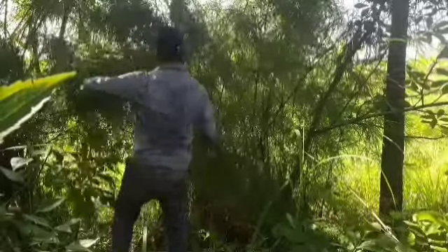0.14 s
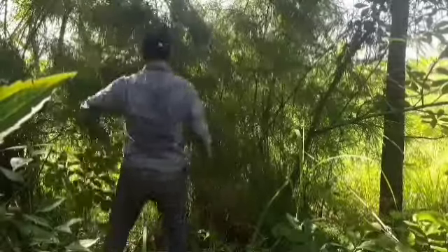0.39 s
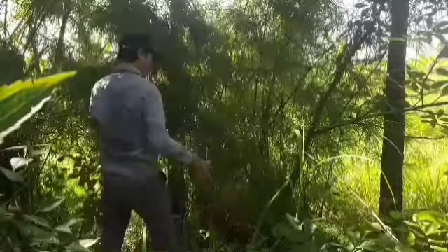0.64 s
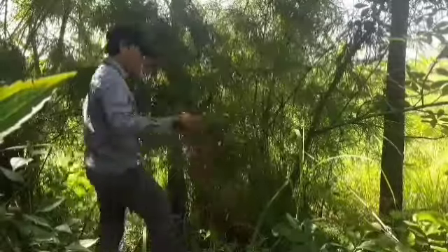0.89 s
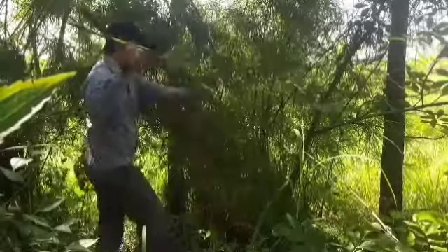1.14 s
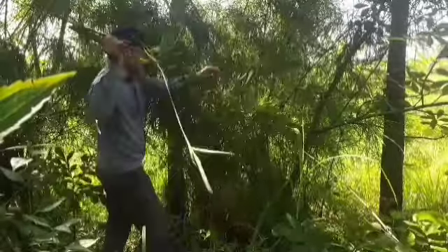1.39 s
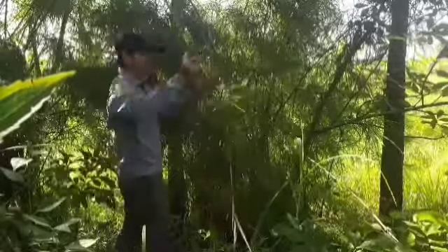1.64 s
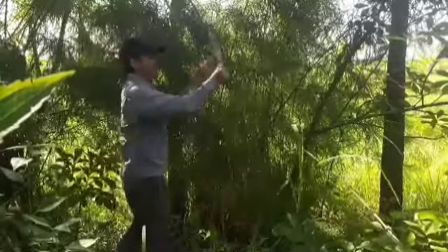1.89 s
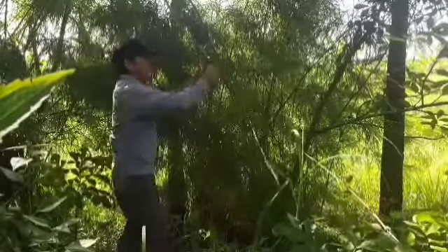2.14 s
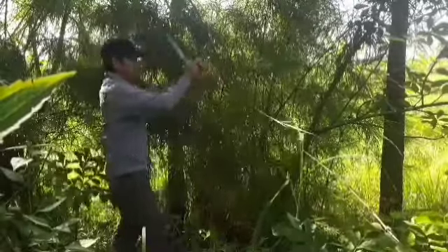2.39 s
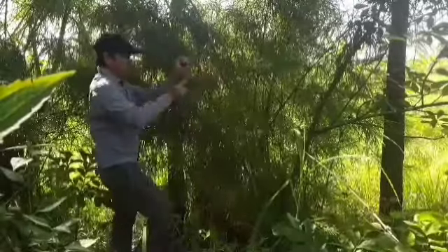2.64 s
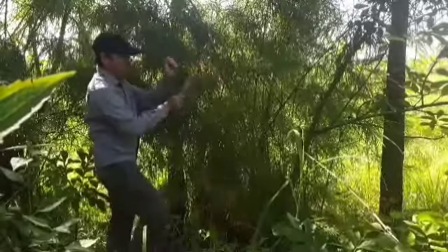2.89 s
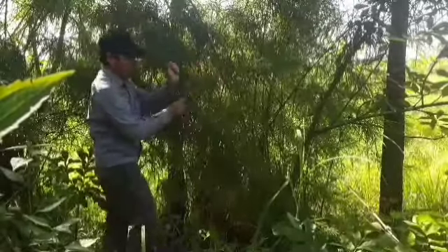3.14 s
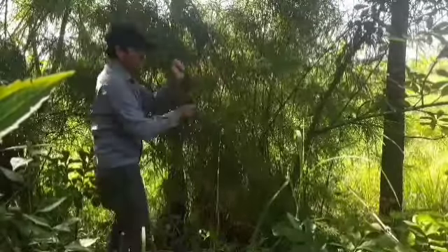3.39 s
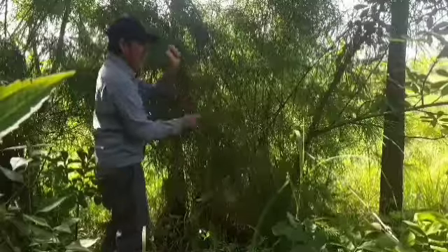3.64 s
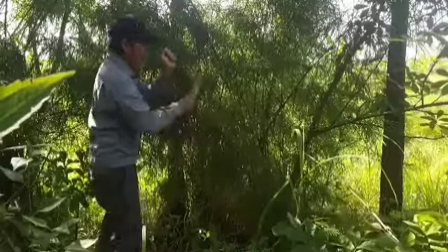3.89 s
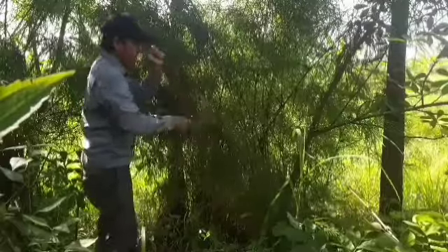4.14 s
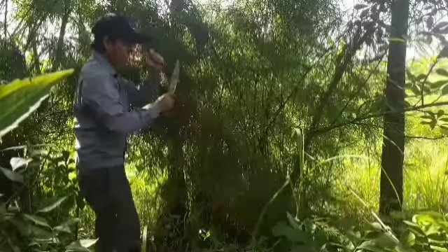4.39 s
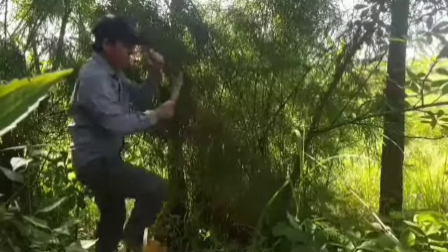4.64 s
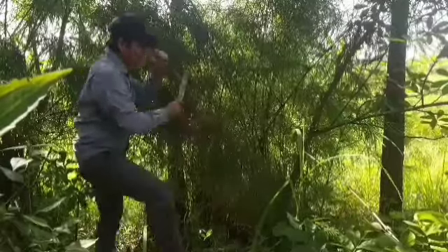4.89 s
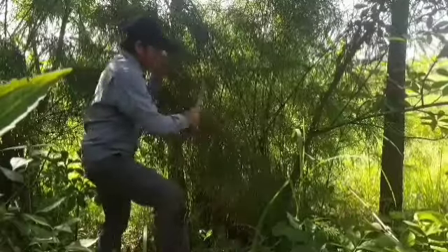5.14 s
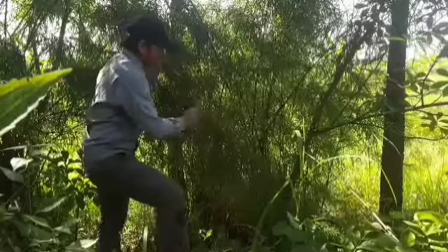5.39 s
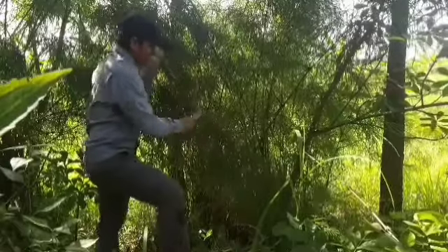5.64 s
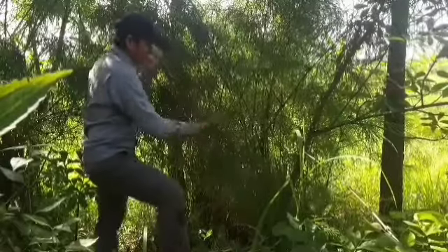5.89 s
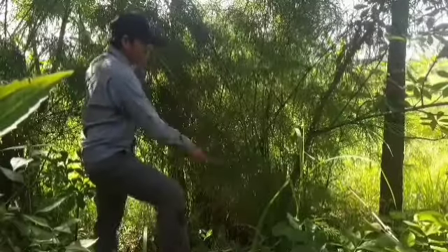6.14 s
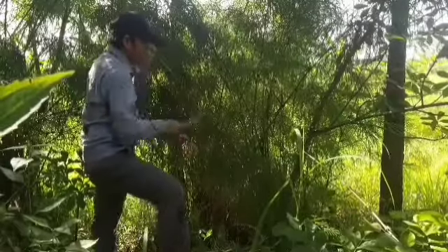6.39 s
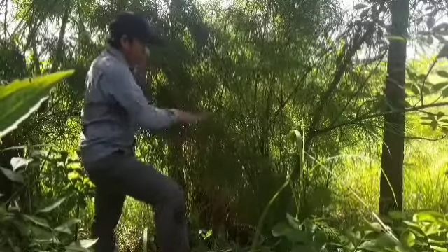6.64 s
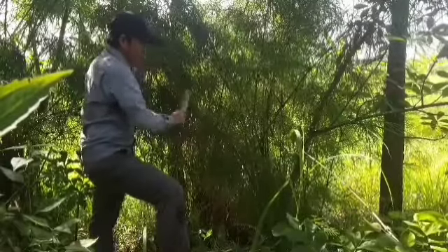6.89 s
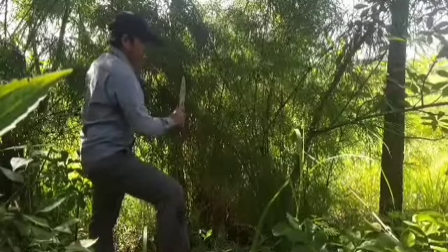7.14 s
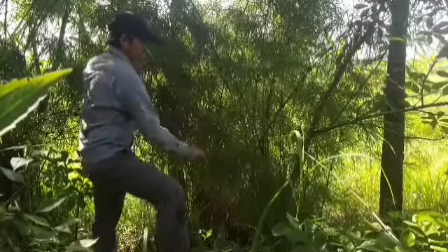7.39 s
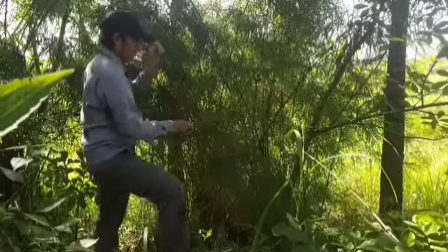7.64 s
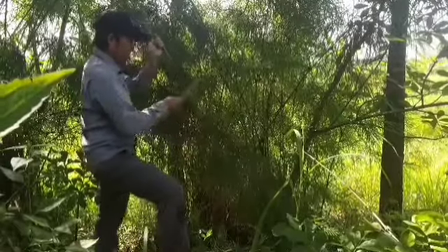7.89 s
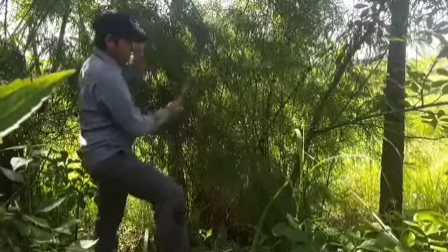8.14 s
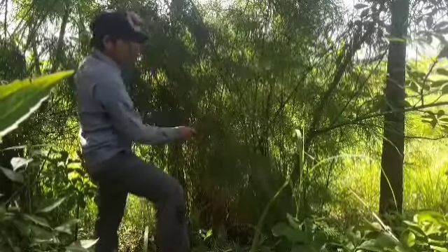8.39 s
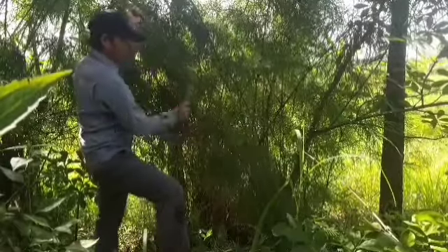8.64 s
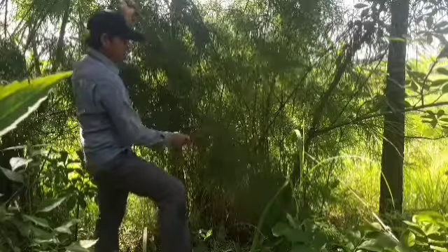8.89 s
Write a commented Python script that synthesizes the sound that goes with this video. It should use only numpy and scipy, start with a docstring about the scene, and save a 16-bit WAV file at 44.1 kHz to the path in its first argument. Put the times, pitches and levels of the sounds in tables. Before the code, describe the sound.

In a thicket outdoors, a few metres from the microphone, leaves swell into a loud brushing rustle at 0.3-0.7 s with small twig snaps, and again around 1.2-1.3 s with a soft scuff. A lull follows, with very faint falling bird peeps at about 1.6 and 2.1 s. From 2.3 s a machete hacks thin woody stems: short, dry, bright cracks at uneven intervals, often preceded by a light blade tap, the one near 2.85 s especially sharp. Chops continue through 3-5 s with twig snaps, dull scuffs and leaf shakes; a strong, longer splintering break comes at 5.1 s, another crack at 5.4 s. Strokes near 6.0, 6.2 and 6.6 s bring a sharp leafy swish, then a pause until a double crack at 7.5 s, and more at 8.0 and 8.5 s, ending in soft rustle. Low wavering rumble and thin hiss lie underneath, with short diffuse woodland reverberation.

```python
"""Leaves rustle and twigs snap over a low outdoor rumble and a thin hiss, with a far bird peeping.
Then a machete hacks thin woody stems in a thicket, a few metres from the microphone.
Its taps and cuts are decaying noise bursts that ring modes of blade and wood; torn stems crackle in clumps.
Foliage is filtered noise and ticks that swell with each movement; scuffs and thuds are dull noise swells.
Rumble and hiss are shaped noise with a faint drone; the bird is falling sine notes heard by reverberation."""
import sys
import numpy as np
from scipy import signal
from scipy.fft import rfft, irfft, next_fast_len
from scipy.io import wavfile
from scipy.ndimage import map_coordinates

SR = 44100
rng = np.random.default_rng(int(sys.argv[2]) if len(sys.argv) > 2 else 0)


def digitize_waveform(pressure):
    """Quantize a signal to 16-bit integers and store it at the path in sys.argv[1].

    Rows of a 2-D input are taken as channels; values are limited to [-1, 1].
    """
    field = np.atleast_2d(pressure).T
    bounded = np.clip(field, -1, 1)
    quanta = np.round(bounded * 32767).astype(np.int16)
    wavfile.write(sys.argv[1], SR, quanta)


N = 397341

# The blade breaks through a stem. Each row: time of the break in seconds, crack level in dB, low wood in dB,
# high wood in dB, top treble edge in dB, decay by 60 dB in seconds, knock pitch in Hz,
# relative splintering level in dB, relative thud level in dB.
CUT_ROWS = [(2.3102, -34.5, -4.5, -7.5, 0.5, 0.013, 2000, -48, -65),
            (2.5459, -33, 1.5, -4, 3.5, 0.016, 2450, -42, -52.5),
            (2.8469, -23.5, -9, -10.5, -0.5, 0.01, 1820, -46.5, -49),
            (3.2573, -30.5, -6.5, -7.5, -1.5, 0.02, 2460, -44, -69),
            (3.7539, -30.5, -6.5, -13, 4.5, 0.0085, 2250, -52, -60.5),
            (3.9973, -33, -14, -13, -5, 0.021, 1330, -61, -53.5),
            (4.1881, -35.5, 5.5, -19, 7.5, 0.01, 950, -47.5, -54.5),
            (4.5188, -27.5, -12, -5, -5, 0.015, 4400, -43, -80),
            (4.859, -34.5, -10.5, -10.5, -13, 0.02, 1500, -48.5, -75),
            (5.1046, -29, 9.5, 7.5, 4.5, 0.052, 3470, -44, -62),
            (5.391, -26, -5.5, -11, -6.5, 0.0092, 3500, -39.5, -60),
            (5.9685, -36, -7.5, -10, -3, 0.026, 4820, -50, -79),
            (6.2276, -47.5, 3, 3, -22, 0.017, 2220, -48, -77),
            (6.571, -30.5, -7.5, -7.5, -18, 0.017, 2940, -43, -58),
            (7.5254, -31, -4, -4, 7, 0.011, 2200, -40.5, -80),
            (7.559, -31, -2.5, -8, 7, 0.021, 4960, -39, -57.5),
            (8.019, -36.5, -2, -8.5, -13, 0.018, 4400, -34.5, -45.5),
            (8.503, -30, -15, -10, -1.5, 0.0094, 4370, -41.5, -74.5),
            (8.5303, -34.5, -0.5, 4, -8, 0.0076, 4540, -50, -65)]


def amp(db):
    """Decibels to gain."""
    return 10 ** (np.asarray(db) / 20)


def unit(x):
    """x at rms 1."""
    return x / np.sqrt(np.mean(x ** 2) + 1e-20)


def along(points, hz):
    """(Hz, value) points read on a log frequency axis."""
    f, v = np.transpose(points)
    return np.interp(np.log(hz + 1), np.log(f + 1), v)


def wobble(rate):
    """A smooth random curve through rate random knots a second."""
    knots = rng.standard_normal(int(N * rate / SR) + 4)
    return map_coordinates(knots, [np.arange(N) * rate / SR])


def coloured(x, level):
    """x through the causal minimum-phase filter whose gain in dB is level(Hz)."""
    m = 2 * next_fast_len((len(x) + 4096) // 2)
    gain = amp(level(np.fft.rfftfreq(m, 1 / SR)))
    cepstrum = irfft(np.log(gain + 1e-6), m)
    # folding the cepstrum onto positive time makes the filter causal
    cepstrum[1:m // 2] *= 2
    cepstrum[m // 2 + 1:] = 0
    return irfft(rfft(x, m) * np.exp(rfft(cepstrum)), m)[:len(x)]


def shaped(x, spectrum):
    """Long noise given a spectrum, at rms 1."""
    m = next_fast_len(N + SR // 4)
    gain = amp(along(spectrum, np.fft.rfftfreq(m, 1 / SR)))
    return unit(irfft(rfft(x, m) * gain, m)[:N])


def crackle(size, rate, spread_db, smooth):
    """Tiny clicks of random sign, rate a second, on a bed of smooth noise."""
    chance = rng.random(size)
    strength = np.minimum(rng.standard_exponential(size), 4)
    clicks = (chance < rate / SR) * amp(spread_db * strength) * rng.choice([-1, 1], size)
    return unit(unit(clicks) + smooth * rng.standard_normal(size))


def add(track, s, sound):
    """Mix a sound into the track at time s in seconds."""
    start = max(0, round(s * SR))
    track[start:start + len(sound)] += sound[:max(0, N - start)]


def scattered(x, wet_db):
    """The diffuse return of x from the surrounding stems: a fresh decaying noise tail at every call."""
    # Reverberation of the thicket. Each row: frequency in Hz, decay by 60 dB in seconds.
    thicket_decay = [(200, 0.28), (2000, 0.21), (8000, 0.24), (15000, 0.26)]
    hz, t, z = signal.stft(rng.standard_normal(SR // 3), SR, nperseg=256)
    decay = amp(-60 * t / along(thicket_decay, hz)[:, None])
    onset = 1 - np.exp(-t / 0.00067)
    tail = signal.istft(z * decay * onset, SR, nperseg=256)[1]
    return amp(wet_db) * signal.fftconvolve(x, tail / np.linalg.norm(tail))


def outdoors():
    """A low noise rumble of wavering level with a faint two-partial drone, and steady thin high hiss."""
    # Slow course of the rumble. Each row: time in seconds, relative level in dB.
    rumble_course = [(0.0, -59.5), (0.42, -61.5), (0.57, -55), (0.92, -57.5), (1.15, -62.5), (1.68, -58),
                     (2.2, -62.5), (2.5, -63.5), (2.68, -56.0), (2.95, -63), (3.15, -55.5), (3.7, -65),
                     (4.15, -50.5), (4.5, -58.5), (5.2, -54.5), (5.3, -66), (5.45, -51), (5.65, -57.5),
                     (6.35, -58.5), (6.9, -57.5), (7.85, -55), (8.1, -50.5), (8.7, -60.5), (9.01, -56.5)]
    # Colour of the rumble noise. Each row: frequency in Hz, relative level in dB.
    rumble_spectrum = [(20, -34.5), (32, -21.5), (45, -5), (57, 5.5), (72, 1.5), (98, -3.5), (118, 0),
                       (150, -4.5), (200, -13.5), (290, -14.5), (400, -32.5), (600, -59)]
    # Colour of the hiss. Each row: frequency in Hz, relative level in dB.
    hiss_spectrum = [(200, -26), (400, -8.5), (700, -12), (1200, -18), (2400, -15), (3500, -25),
                     (5200, -20), (7200, -14), (7900, -1.5), (8800, 7), (9800, -16.5), (15500, -38)]
    times, levels = np.transpose(rumble_course)
    rumble_db = np.interp(np.arange(N) / SR, times, levels)
    # the drone's pitch wanders around 57.5 Hz
    phase = 2 * np.pi * np.cumsum(57.5 + 2 * wobble(7)) / SR
    drone = np.sin(phase) + 0.64 * np.sin(2 * phase + wobble(15))
    waver_db = 1.0 * wobble(rate=12)
    rumble_noise = shaped(rng.standard_normal(N), rumble_spectrum)
    rumble = amp(rumble_db + waver_db - 0.3) * unit(rumble_noise + 0.34 * drone)
    return rumble + amp(-68.5) * shaped(rng.standard_normal(N), hiss_spectrum)


def bird():
    """A far bird: brief falling whistles, only their diffuse return reaching us from deep in the wood."""
    # Each row: time of the note's peak in seconds, pitch there in Hz, relative level in dB,
    # time from peak to 1/e in seconds.
    peep_rows = [(1.569, 3220, -75, 0.0089), (1.71, 3280, -86, .025), (2.106, 3350, -86.5, 0.013)]
    fall_hz_per_s = 2700
    track, t = np.zeros(N), np.arange(-SR // 10, SR // 10) / SR
    for s, hz, db, length in peep_rows:
        tone = np.sin(2 * np.pi * (hz - fall_hz_per_s * t / 2) * t)
        note = amp(db) * np.exp(-(t / length) ** 2) * tone
        add(track, s + t[0], scattered(note, wet_db=1.0))
    return track


def swell(s, rise, fall):
    """Gain that grows smoothly to 1 at time s and then dies away."""
    damping = 1.31  # exponent of the fall; above 1 a branch comes to rest more abruptly
    t = np.arange(N) / SR - s
    distance = np.where(t < 0, (t / rise) ** 2, np.abs(t / fall) ** damping)
    return np.exp(-np.minimum(distance, 20))


def twig_ticks(rate, centre_hz, cycles, spread_db):
    """Small twigs tapping each other: decaying sine grains, each with its own brief pitch; rms 1."""
    draws = rng.random((int(rate * N / SR), 3))  # time, pitch and strength of each tap
    t = np.arange(SR // 250)
    hz = centre_hz * 5 ** (draws[:, 1:2] - .5)
    strength = np.minimum(-np.log(1 - draws[:, 2:]), 3)
    size = np.sqrt(hz) * amp(spread_db * strength)
    phase = hz * t / SR  # in cycles
    grains = size * np.sin(2 * np.pi * phase) * np.exp(-phase / cycles)
    places = (draws[:, :1] * N).astype(int) + t
    return unit(np.bincount(places.ravel(), grains.ravel(), N)[:N])


def foliage():
    """Fine leaves brush and tick when a branch is moved or cut, while twigs scrape, tap and knock."""
    # Branches pulled, pushed or thrown aside. Each row: time at the height in seconds, relative leaf level in dB,
    # relative twig level in dB, rise in seconds.
    rustle_rows = [(0.3, -56.5, -73, 0.55), (0.54, -46, -52, 0.13), (0.65, -48.5, -52.5, 0.071),
                   (0.96, -59.5, -78.5, 0.14), (1.19, -51, -64.5, .075), (1.28, -51, -58, 0.063),
                   (1.42, -63.5, -80, 0.074), (1.62, -69, -88, 0.065), (1.902, -64.5, -71.5, 0.075),
                   (2.68, -62, -66.5, 0.11), (3.0, -66.5, -74.5, 0.24), (3.22, -58, -66, 0.043),
                   (3.458, -57.5, -66, 0.067), (3.7, -67, -71, 0.056), (3.87, -59, -65.5, 0.065),
                   (4.11, -62.5, -64, 0.11), (4.23, -64, -60, 0.12), (4.96, -59, -65.5, 0.045),
                   (5.741, -63, -80, 0.093), (6.258, -49, -54, 0.028), (6.93, -63.5, -77.5, 0.13),
                   (7.48, -63, -69, .06), (7.73, -79.5, -76.5, 0.028), (8.159, -53, -60, 0.075),
                   (8.7, -64.5, -81, 0.21), (8.98, -60.5, -75, 0.25)]
    # Colour of the leaves. Each row: frequency in Hz, relative level in dB.
    leaf_spectrum = [(300, -71), (2500, -29.5), (5000, -11), (7200, -10), (7900, -1.5), (8700, 1),
                     (10500, -2.5), (12300, -1.5), (14000, -6.5), (15500, -4)]
    # Colour of the scraping twigs. Each row: frequency in Hz, relative level in dB.
    twig_spectrum = [(100, -30), (400, -1.5), (900, 3.5), (2200, 4), (4500, 4.5), (7000, -4.5),
                     (12000, -48)]
    still_leaf_db, still_twig_db = -75, -93  # relative levels between movements
    shake_leaf_db, shake_twig_db = -20, -31.5  # a cut's shaking, added to its splintering column
    shake_delay_s, shake_rise_s, shake_fall_s = 0.079, 0.041, 0.15

    # a moved branch settles as slowly as it rose
    moves = [(s, leaf_db, twig_db, rise, rise) for s, leaf_db, twig_db, rise in rustle_rows]
    for s, *_, db, _ in CUT_ROWS:
        moves.append((s + shake_delay_s, db + shake_leaf_db, db + shake_twig_db, shake_rise_s, shake_fall_s))
    leaf_power, twig_power = amp(still_leaf_db) ** 2, amp(still_twig_db) ** 2
    for s, leaf_db, twig_db, rise, fall in moves:
        motion = swell(s, rise, fall) ** 2
        leaf_power = leaf_power + amp(leaf_db) ** 2 * motion
        twig_power = twig_power + amp(twig_db) ** 2 * motion

    flutter = wobble(28)
    touches = crackle(N, rate=3000, spread_db=3.5, smooth=1.1)
    dry_leaves = amp(-9) * crackle(N, rate=110, spread_db=-1, smooth=0)  # single ticks
    leaf_gain = amp(3 + 1.8 * flutter + 0.55 * wobble(160))
    leaves = leaf_gain * shaped(touches + dry_leaves, leaf_spectrum)

    scrape = shaped(rng.standard_normal(N), twig_spectrum)
    taps = twig_ticks(rate=220, centre_hz=2690, cycles=2.2, spread_db=1.5)
    knocks = twig_ticks(rate=70, centre_hz=1700, cycles=3.1, spread_db=3)  # thicker twigs
    twigs = amp(-4.5 + 1.1 * flutter) * unit(scrape + amp(-5) * taps + amp(-8.5) * knocks)
    return np.sqrt(leaf_power) * leaves + np.sqrt(twig_power) * twigs


def scuffs():
    """Soft swells of litter underfoot, each around its own pitch; each cut's dull knock and lower shudder."""
    # Dull scuffs of feet and thrown branches. Each row: time of the peak in seconds, level in dB,
    # time from peak to 1/e in seconds, centre in Hz.
    scuff_rows = [(1.294, -59.5, 0.047, 387), (2.596, -56.5, 0.019, 417), (2.672, -63.5, 0.054, 305),
                  (3.883, -55.5, 0.025, 290), (4.242, -63, 0.027, 330), (4.312, -57.5, 0.032, 322)]
    # A cut stem knocks, then its base shudders, at pitches shared by all cuts. Each row: delay after the cut
    # in seconds, level in dB added to the cut's thud column, time from peak to 1/e in seconds, centre in Hz.
    thud_rows = [(0.007, 1.5, 0.007, 704), (0.025, -9.5, 0.029, 359)]
    # Colour of a scuff centred on 500 Hz. Each row: frequency in Hz, relative level in dB.
    scuff_spectrum = [(90, -51), (280, -0.5), (430, 7), (560, 2), (850, -3), (1500, -14.5), (3200, -33),
                      (9000, -52)]
    track, t = np.zeros(N), np.arange(-SR // 6, SR // 6) / SR
    thuds = [(s + delay, thud_db + db, length, hz)
             for s, *_, thud_db in CUT_ROWS for delay, db, length, hz in thud_rows]
    for s, db, length, centre_hz in scuff_rows + thuds:
        grains = crackle(len(t), rate=400, spread_db=3.5, smooth=1.0)
        litter = coloured(grains, lambda f: along(scuff_spectrum, f * 500 / centre_hz))
        add(track, s + t[0], amp(db) * unit(litter) * np.exp(-(t / length) ** 2))
    return track


def splinters():
    """The blade sweeps in through leaves; the severed stem tears in a dense, clumped crackle that dies quickly."""
    # Colour of the tearing. Each row: frequency in Hz, relative level in dB.
    tear_spectrum = [(80, -23), (300, -16.5), (900, -4.5), (2200, -0.5), (4500, -2.5), (7100, -10),
                     (7900, -2.5), (10000, 2.5), (10700, -4.5), (12000, -1), (15500, -5)]
    track, t = np.zeros(N), np.arange(-SR // 20, SR // 4) / SR
    sweep = amp(-17.5) * np.exp(-((t + 0.0079) / 0.013) ** 2)
    rip = (1 - np.exp(-np.maximum(t, 0) / 0.0014)) * amp(-60 * t / 0.11)
    for s, _, _, wood_db, *_, db, _ in CUT_ROWS:
        body_db = -9 + 0.15 * wood_db  # woody body partly follows the stem's high wood
        clumps = amp(2 * map_coordinates(rng.standard_normal(96), [(t - t[0]) * 300]))
        grains = crackle(len(t), rate=1700, spread_db=0.0, smooth=1.0) * clumps
        body = [(3000, body_db), (7500, 0)]  # Hz, dB
        tear = unit(coloured(grains, lambda f: along(tear_spectrum, f) + along(body, f)))
        tear = amp(db + 7.5) * tear * (sweep + rip)
        add(track, s + t[0], tear)
        add(track, s + t[0], scattered(tear, wet_db=-4.5))
    return track


def resonance(f, hz, width):
    """Complex gain of one mode, 1 at its centre."""
    return 1 / (1 + 2j * (f - hz) / width)


def crack(db, low_db, high_db, edge_db, t60, knock_hz, rise):
    """Fibres give way faster and faster, the stem breaks 10 ms in, and blade and wood ring for a moment."""
    # Colour of the bare break. Each row: frequency in Hz, relative level in dB.
    crack_spectrum = [(60, -1), (250, -3), (600, -6), (1500, -0.5), (3000, 4), (5500, 2.5), (7200, -0.5),
                      (7900, 4), (9000, 2.5), (10500, -2.5), (12000, -0.5), (15500, -1.5)]
    # Ring of blade and stems. Each row: central pitch in Hz, width in Hz, central lift in dB.
    ring_modes = [(786, 72, 1.5), (1322, 52, 3.5), (2198, 170, 6), (3275, 28, -10), (4406, 120, 9.5),
                  (6260, 220, 11), (8070, 190, 12), (9770, 380, 8.5), (11530, 1100, 10)]
    lead = SR // 100
    t = np.arange(-lead, SR // 20) / SR

    def sized(x):
        """x scaled to the energy of 5 ms at rms 1."""
        return x * np.sqrt(.005 * SR) / np.linalg.norm(x)

    life = max(t60, .003)  # seconds
    # tough stems that fail slowly also start slowly
    envelope = amp(-60 * np.maximum(t / life, -t / (rise * life)))
    fibres = crackle(len(t), rate=5000, spread_db=1.0, smooth=0.91) * envelope
    force = fibres / np.linalg.norm(fibres)
    force[lead] += 0.2 * min(1, 0.0015 / life)  # the break's single step, weaker for a slow break
    stem = [(2400, low_db), (3600, high_db), (7100, high_db), (7700, 0), (9900, 0.0099), (12200, edge_db)]
    bare = coloured(force, lambda f: along(crack_spectrum, f) + along(stem, f))

    # every contact rings the modes at slightly new pitches and new strengths
    chance = rng.standard_normal((len(ring_modes), 2))
    modes = [(hz * (1 + .005 * a), width, lift + 2.5 * b)
             for (hz, width, lift), (a, b) in zip(ring_modes, chance)]
    # the struck stem adds its own knock, and its side twigs ring at chance pitches
    modes.append((knock_hz, 0.082 * knock_hz, 12.5))
    modes += [(hz, 40, 3) for hz in 1000 * 15 ** rng.random(size=12)]

    def ring_db(f):
        """Lift in dB from the summed power of all modes."""
        power = sum(np.abs(amp(lift) * resonance(f, hz, width)) ** 2 for hz, width, lift in modes)
        return 10 * np.log10(1 + power)

    snap = coloured(bare, ring_db)
    # a quick clip of the blade stirs the thicket less than a slow break
    stir = min(1, life / 0.0073) ** .5
    sound = stir * scattered(sized(bare + 0.64 * snap), wet_db=-7.0)
    sound[:len(t)] += amp(0.07) * sized(snap)
    return amp(db) * sound


def cracks():
    """Blade taps, cuts and snapping twigs all crack the same way, with their own brightness and build-up."""
    # The blade meets a stem on its way in. Each row: time of the contact in seconds, crack level in dB,
    # mean wood level in dB, decay by 60 dB in seconds, knock pitch in Hz.
    tap_rows = [(2.5299, -40, -3, 0.019, 2360), (2.8329, -32.5, -9, 0.018, 1880),
                (3.238, -38.5, -2.5, 0.017, 4450), (3.7334, -31, -9.5, 0.0088, 2410),
                (3.9804, -32.5, -5.5, 0.022, 2260), (4.4427, -41, -11.5, 0.0067, 2110),
                (4.4948, -46, -5, 0.021, 4360), (4.8226, -43, -1, 0.011, 2460),
                (5.062, -34, -12, .017, 4970), (5.3558, -39.5, -9.5, 0.042, 4360),
                (5.876, -37.5, -9.5, 0.017, 3120), (6.1306, -31.5, -13, 0.011, 6200),
                (6.5078, -34.5, -13.5, 0.016, 4450), (7.9711, -34.5, -14.5, 0.022, 3070),
                (8.487, -40.5, -13.5, .02, 4350)]
    # Side twigs and last fibres snap. Each row: time of the break in seconds, crack level in dB,
    # mean wood level in dB, top treble edge in dB, decay by 60 dB in seconds.
    snap_rows = [(0.3855, -42.5, -27, -1, 0.012), (0.3974, -34, -33, -5.5, 0.03),
                 (0.4343, -39, -16, 4, .014), (0.678, -37, -11, 4, 0.063), (1.3016, -46, -14, 3, 0.018),
                 (1.4234, -56, 2, -6, .028), (2.2846, -51.5, -2, -2, 0.046), (2.645, -52, -15, -2, .024),
                 (2.7432, -46.5, -10, 4, 0.027), (3.1077, -56.5, -7.5, 2, 0.026),
                 (3.1773, -46, -2, 2, 0.065), (3.644, -53.5, -6.5, -17, 0.009), (4.0368, -44.5, 2, 0, .011),
                 (4.1409, -48, -14, -1, 0.041), (4.1741, -52, -8, 1, .012),
                 (4.2182, -31.5, -5, 6.5, 0.0043), (4.239, -41, -3, 3, .029),
                 (4.289, -44.5, -2, -13, 0.019), (4.2983, -34, -12, 6.5, 0.011),
                 (5.0789, -40, -7, -1, 0.058), (5.1168, -25, -10, -1, .022), (5.411, -39, -11, 7, 0.014),
                 (5.922, -41, -3.5, 3, 0.11), (6.1849, -39.5, -4.5, -1.5, 0.043),
                 (6.2978, -46, -29, -7, .026), (6.3556, -53, -15, 10, .014),
                 (6.5317, -36.5, -10, -1, 0.023), (6.5529, -43.5, 1, -6, .03),
                 (6.914, -47.5, -26, -4, 0.027), (7.487, -47.5, -12, -3, .04),
                 (7.499, -48, -9.5, -2, 0.025), (7.994, -42, 0, 2, .03), (8.0286, -32, -12.5, -6, 0.031),
                 (8.5358, -33, -7.5, -10, 0.019)]
    tap_rise, cut_rise, snap_rise = 0.34, 0.35, 0.51  # build-up as a share of the decay time
    tilt_db = 1.23  # taps and snaps: wood stronger below 2.4 kHz and weaker from 3.6 kHz
    glance_edge_db = -9.5  # a glancing tap is dull in the top treble
    lead_s = .01  # each crack breaks this long after it begins
    track = np.zeros(N)
    for s, db, wood_db, t60, knock_hz in tap_rows:
        tap = crack(db, wood_db + tilt_db, wood_db - tilt_db, glance_edge_db, t60, knock_hz, tap_rise)
        add(track, s - lead_s, tap)
    for s, db, low_db, high_db, edge_db, t60, knock_hz, _, _ in CUT_ROWS:
        add(track, s - lead_s, crack(db, low_db, high_db, edge_db, t60, knock_hz, cut_rise))
    for s, db, wood_db, edge_db, t60 in snap_rows:
        knock_hz = 2000 * np.exp(0.3 * rng.standard_normal())
        snap = crack(db, wood_db + tilt_db, wood_db - tilt_db, edge_db, t60, knock_hz, snap_rise)
        add(track, s - lead_s, snap)
    return track


def scene():
    """Everything as it reaches the one microphone."""
    hacking = cracks() + splinters()
    return (hacking + foliage() + scuffs() + bird() + outdoors())[None]


def record(dry):
    """The microphone's channel cuts steeply above its band limit."""
    top_hz = 15550
    m = next_fast_len(N + SR // 4)
    hz = np.fft.rfftfreq(m, 1 / SR)
    return irfft(rfft(dry, m) / np.sqrt(1 + (hz / top_hz) ** 300), m)[..., :N]


dry = scene()
out = record(dry)
digitize_waveform(out)
```